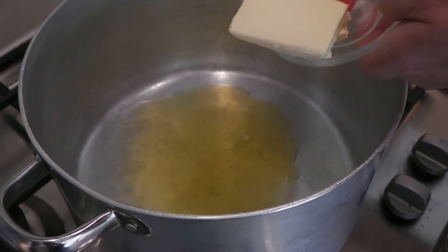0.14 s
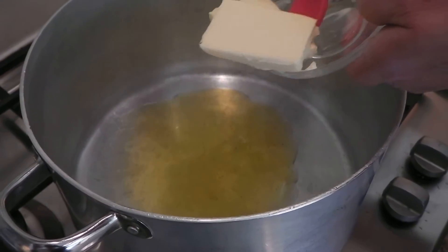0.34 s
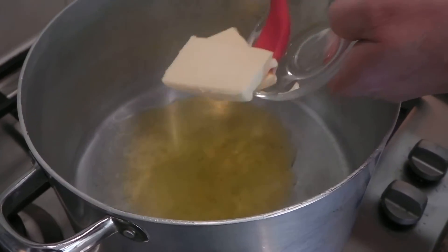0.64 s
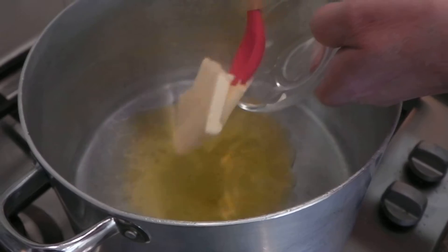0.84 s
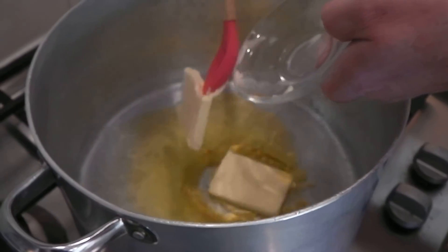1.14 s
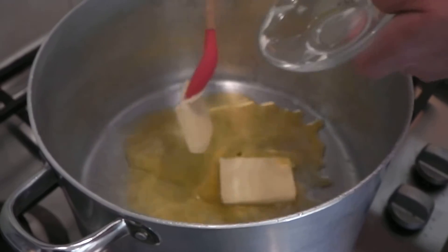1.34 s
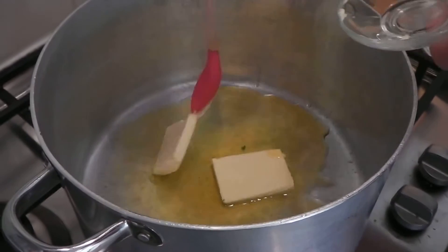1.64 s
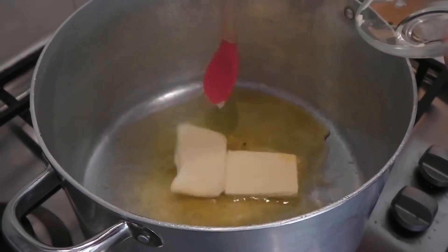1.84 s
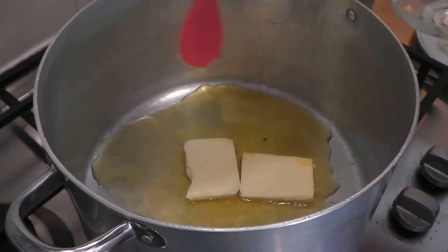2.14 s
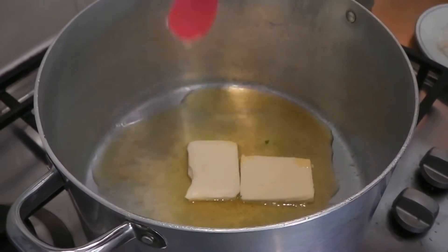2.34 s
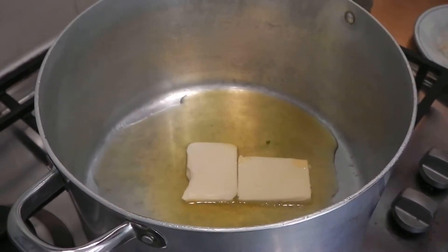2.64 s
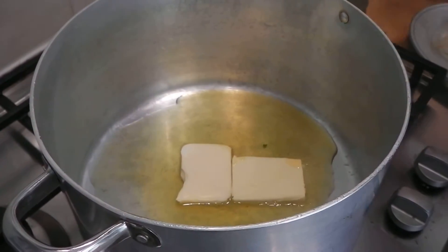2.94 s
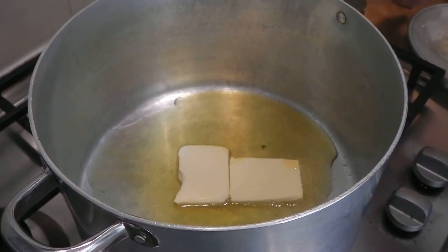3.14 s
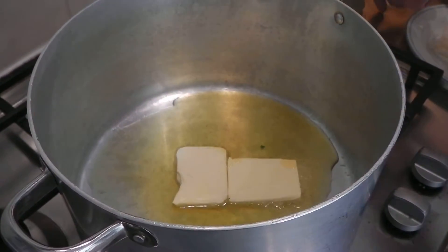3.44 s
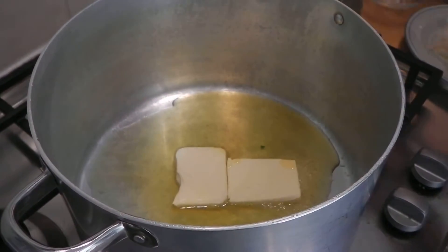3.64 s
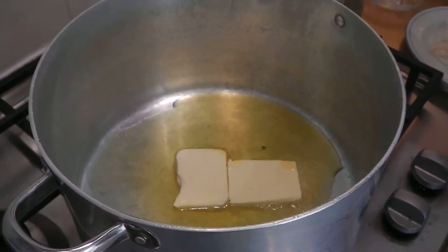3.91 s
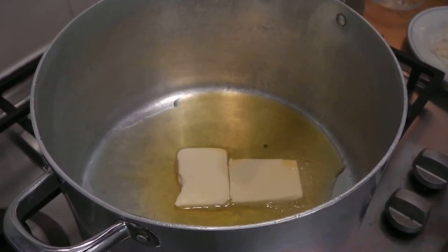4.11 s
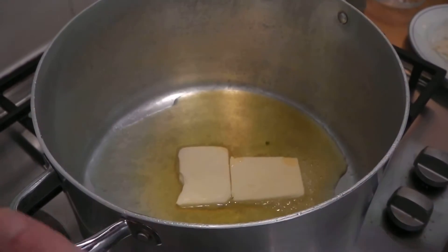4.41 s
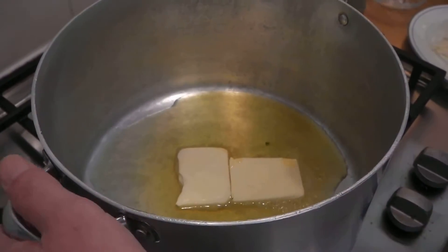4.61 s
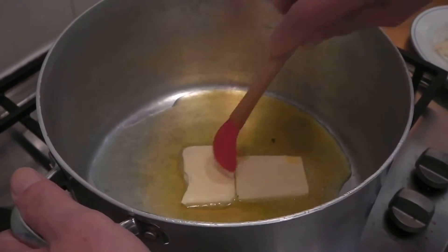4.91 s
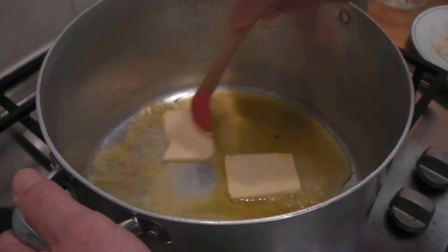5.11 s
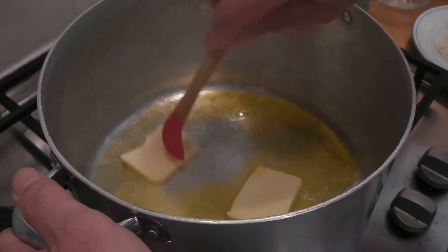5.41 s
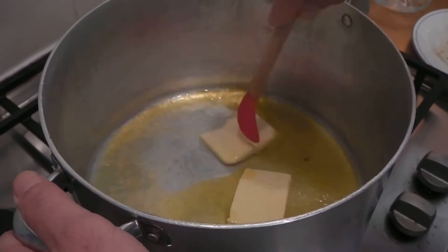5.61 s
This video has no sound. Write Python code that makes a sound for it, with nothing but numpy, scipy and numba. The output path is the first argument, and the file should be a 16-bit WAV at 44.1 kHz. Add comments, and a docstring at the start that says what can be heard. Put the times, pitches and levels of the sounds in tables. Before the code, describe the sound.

Close above a steel pot on a gas stove in a small kitchen, stereo. Steady burner hiss with faint low bubble pings; butter lands with a small wet click, another follows, and sizzling grows. A glass dish is set down with a ringing clink, rattles and drags briefly. The sizzle thickens with sharp spits, then a hard spatula knock and softer thuds on the pot.

```python
"""A gas burner hisses under a steel pot of hot oil; slabs of butter slide in and sizzle, heard from close above.
The jets are noise in fixed resonances; boiling is a sum of decaying tones and puffs of band-limited noise.
Bubbles spit as pitched pops in steam, or ping low with rising pitch; blows excite the damped modes of the pot.
A glass dish, set down and dragged on the counter of a small kitchen, adds struck modes and rough sliding noise."""
import sys
import numpy as np
from scipy import signal
from scipy.fft import rfft, irfft, next_fast_len
from scipy.io import wavfile
from scipy.ndimage import uniform_filter1d
from numba import njit

SR = 44100
rng = np.random.default_rng(int(sys.argv[2]) if len(sys.argv) > 2 else 0)


def digitize_waveform(pressure):
    """Quantize a signal to 16-bit integers and store it at the path in sys.argv[1].

    Rows of a 2-D input are taken as channels; values are limited to [-1, 1].
    """
    field = np.atleast_2d(pressure).T
    bounded = np.clip(field, -1, 1)
    quanta = np.round(bounded * 32767).astype(np.int16)
    wavfile.write(sys.argv[1], SR, quanta)


def linear_from_db(decibels):
    """Turn decibels (scalar or array-like) into linear amplitude factors; 0 gives 1."""
    return 10 ** (np.asarray(decibels, float) / 20)


N = 254317
T = np.arange(N) / SR

# Resonances of the gas jets: [f/Hz, width/Hz, relative level/dB]
JETS = [(1663.5, 120, -1.5), (2544, 23, -15), (4034, 203, -4.5), (5630, 75, -21), (6190, 140, -7.5),
        (7210, 210, -17.5), (9050, 150, -26), (10760, 610, -28), (14200, 100, -32)]
# Hush of the kitchen, relative spectrum: [f/Hz, level/dB per Hz]
KITCHEN_SPECTRUM = [(15, -64), (25, -53), (84, -7.5), (236, -20.5), (416, -11.5), (887, -12.5), (1650, -9),
                    (2000, -14), (2910, -18), (4030, -23), (5140, -19.5), (6210, -14.5), (7920, -18.5),
                    (10700, -31), (16000, -23.5)]
# Water boiling in the butter: [t/s, fizz level/dB before the low part is scaled, treble spray level/dB,
# pot hum level/dB, gain of the low fizz/dB]
BOILING = [(1.05, -60, -59, -43, -6), (1.3, -63, -64, -57, -8), (1.5, -44.5, -49.5, -44.5, -9),
           (1.8, -46, -55, -50, 7), (1.88, -48.5, -64, -48, -19), (2.0, -53, -60, -48, -7),
           (2.15, -36.5, -48, -40, 5), (2.6, -41.5, -48, -37, 3.5), (3.05, -33, -45.5, -37.5, -4),
           (3.11, -38.5, -45, -40.5, -13), (3.3, -34.5, -44, -32, 3), (3.5, -33.5, -41.5, -69, -21),
           (3.7, -31, -43, -37, -3), (4.5, -28, -48.5, -38.5, -3.5), (4.66, -30.5, -54, -36.5, -3.5),
           (5.05, -28.5, -45, -39.5, -5.5), (5.3, -31, -42, -46, -2), (5.6, -28, -37, -46.5, -7.5),
           (5.77, -30.5, -35, -40, -3)]
# Relative spectrum of the fizz: [f/Hz, level/dB per Hz]
FIZZ_SPECTRUM = [(350, -62), (600, -30), (931, -8), (1370, -8.5), (1530, -3), (1980, -10), (3080, -2.5),
                 (3340, -7), (5050, -1), (7110, -3), (7940, -6.5), (8990, 2), (16000, -22)]
# Modes of the pot before the oil damps them: [f/Hz, t60/s]
POT_MODES = [(370, 0.42), (425, 0.31), (650, 0.11), (800, 0.22), (940, 0.15), (1270, 0.41), (1670, 0.12),
             (2062, 0.29), (2350, 0.12), (2600, 0.21), (3120, 0.099), (3640, 0.2), (3890, 0.16),
             (4140, 0.16), (4930, 0.098), (5300, 0.47), (6060, .1), (6920, 0.042)]
# Share of each pot mode: [relative level/dB]
POT_SHARES_DB = [-6.5, 1.5, -14, -7, 0.5, -9, -9, -9, -3.5, -2, 1.5, -5, 2, 2.5, -5.5, -17, -28, -10.5]
# Loudest spitting bubbles: [t/s, pop level/dB, nominal f/Hz]
LOUD_SPITS = [(1.1505, -21.5, 3670), (1.905, -21, 6300), (2.767, -20.5, 6000), (2.915, -16, 4120),
              (2.954, -23, 5600), (2.979, -25, 6080), (3.05, -25, 4840), (3.2695, -21, 2430),
              (3.8153, -18.5, 4450), (3.935, -20.5, 5970), (4.0749, -19.5, 5390), (4.1474, -24, 5450),
              (4.1565, -16.5, 4850), (4.2767, -20, 5240), (4.5232, -16, 5280), (4.634, -17, 4960),
              (4.674, -16, 5190), (4.7206, -17.5, 5030), (4.9298, -14.5, 4440), (4.99, -20, 5700),
              (5.0168, -16.5, 5300), (5.065, -17, 5820), (5.077, -23, 5740), (5.0983, -17, 5780),
              (5.1186, -20, 4530), (5.1804, -18, 6540), (5.209, -18.5, 5150), (5.254, -26, 5400),
              (5.2713, -21, 4580), (5.2879, -18.5, 4080), (5.3928, -19, 4240), (5.5202, -18.5, 4340),
              (5.5694, -19.5, 5000), (5.6217, -20, 3800), (5.677, -20.5, 3050), (5.698, -16, 3920),
              (5.7334, -24, 3960), (5.7566, -8.5, 4150)]
# Loudest droplets that crack in the treble alone: [t/s, level/dB]
LOUD_TICKS = [(1.1317, -24), (1.151, -21.5), (1.25, -40), (1.909, -23), (2.229, -28.5), (2.704, -29.5),
              (2.954, -27), (3.1234, -13), (3.2387, -33), (3.342, -24.5), (3.6732, -34), (3.9, -27.5),
              (3.9863, -28.5), (4.0107, -29), (4.15, -22.5), (4.2344, -27.5), (4.2833, -45), (4.301, -28),
              (4.365, -32), (4.4144, -29), (4.4963, -22.5), (4.65, -30), (4.707, -32), (4.804, -28.5),
              (4.82, -36), (5.045, -20.5), (5.074, -22.5), (5.108, -20), (5.2053, -23), (5.273, -26),
              (5.3738, -33), (5.6971, -27)]
# Clearest slow bubbles on the floor of the pot, pinging the air inside: [t/s, level/dB, f/Hz at the start]
BUBBLE_PINGS = [(0.063, -39.5, 425), (0.194, -40, 428), (0.329, -40, 426), (.458, -53, 420),
                (0.692, -47.5, 374), (0.726, -47, 382), (0.765, -43, 396), (.863, -52, 405),
                (0.927, -45, 404), (.96, -43, 412), (1.013, -35.5, 415), (1.201, -42, 437),
                (1.235, -42.5, 435), (1.271, -42.5, 416), (1.413, -37, 413), (1.444, -46, 394),
                (1.582, -38.5, 423), (1.62, -42.5, 442), (1.665, -39.5, 400), (1.712, -41.5, 413),
                (1.924, -44, 420), (1.98, -43, 405), (2.28, -41, 370), (2.498, -41, 408), (2.546, -40, 329),
                (4.756, -31.5, 402), (4.933, -38, 398), (5.008, -38.5, 390), (5.248, -29, 403),
                (5.366, -37, 383), (5.431, -56.5, 440), (5.496, -35.5, 426), (5.603, -35.5, 367),
                (5.629, -40, 407), (5.667, -36.5, 416), (5.717, -39, 346)]
# Butter, spatula and hand on the pot: [t/s, relative level/dB, contact/ms, relative crack level/dB]
POT_BLOWS = [(1.133, -26, .8, -6), (1.151, -26.5, 0.32, 14), (1.163, -34, 0.56, -17),
             (3.853, -27.5, 2.6, -14), (4.653, -6.5, 0.39, 5.5), (4.691, -18, 0.59, -20),
             (4.878, -13, 0.65, 3), (5.124, -15, 2.1, -17), (5.219, -20, 1.9, -20)]
# Oil slapping the bare pot: [t/s, level/dB, middle f/Hz, t60/s of the middle pitch]
OIL_SLAPS = [(1.132, -18, 2670, 0.029), (1.1308, -19.5, 5320, 0.025), (1.9094, -15.5, 3290, 0.027),
             (1.9088, -23, 6470, 0.015)]
# Modes of the glass dish: [f/Hz]
DISH_MODES_HZ = [700, 1480, 1545, 2250, 2506, 2950, 3770, 5238]
# The same modes ringing free: [relative level/dB, t60/s]
DISH_RINGING = [(-18, 0.46), (-1.5, 0.56), (-12, 0.6), (-24, 0.38), (3.5, 0.3), (-19, 0.16), (-3, 0.11),
                (-15, 0.17)]
# Modes of the counter and what lies on it: [f/Hz, relative level/dB, t60/s before any cap]
COUNTER_MODES = [(442, -8, 0.11), (1053, -1, 0.06), (1817, 2.5, 0.063), (2430, -4, 0.059),
                 (2820, -6, 0.043), (3610, -1, 0.023), (4570, -26, 0.016), (5340, -21, 0.023),
                 (7150, -16, 0.023), (8900, -12.5, 0.076)]
# Dish put down: [t/s, glass level/dB, counter level/dB, share of the free t60, hardness/dB per octave]
DISH_KNOCKS = [(3.1245, -54, -14, .5, 0), (3.1529, -8.5, -53, 0.78, 0.7), (3.197, -28, -19.5, 1.1, 10),
               (3.389, -18, -27, 0.46, 8.5), (3.499, -45, -35.5, 0.24, 0), (3.506, -41, -23, 0.19, 0),
               (3.541, -33, -27, 0.34, 3), (3.577, -54, -31, .3, 0), (3.5972, -26, -23, 0.19, 3),
               (3.612, -49, -23.5, 0.4, 2), (3.63, -35, -57, 0.4, -10)]
# Handling that shakes stove top and counter: [t/s, level/dB, hold/s, deep part relative to it/dB]
SHAKING = [(1.125, -53, 0.04, 3), (1.705, -54, 0.011, -6), (3.125, -41.5, .12, -23), (3.41, -48, 0.011, -5),
           (3.51, -40.5, 0.11, -14), (3.795, -56, .015, -11), (3.869, -47, 0.015, -18),
           (4.651, -33, 0.064, -17), (4.8, -45.5, 0.12, -12.5), (4.915, -45.5, 0.027, -23),
           (5.0, -47, 0.05, -12), (5.12, -44, 0.092, -14), (5.22, -51, 0.071, -12)]
# Gain of the side signal: [f/Hz, gain/dB]
SIDE_GAIN = [(60, -6), (110, -6.5), (200, -3), (380, -1), (700, -5.5), (1290, -14), (2380, -9),
             (4400, -4.5), (8120, -0.5), (15000, .5)]
# Balance: [t/s, left minus right gain/dB]
BALANCE = [(0.0, 1.6), (1.0, 0.8), (2.0, 0.5), (5.77, -0.9)]

BURNER_DB, BURNER_DRIFT_DB, KITCHEN_DB = -41.5, 1.9, -50.5
SPIT_T60_S, STEAM_DB, SPRAY_DB = 0.06, -10.5, -20.5  # steam and spray relative to the pop
SMALL_SPIT_DB, SMALL_SPIT_HZ = -2, (3110, 6300)  # lesser spits relative to the fizz
TICK_T60_S, SMALL_TICK_DB = 0.025, 7  # lesser ticks relative to the treble spray
FOLLOW_S, FOLLOW_DB = 0.065, -7.5  # delay and relative level of the smaller bubble
DRAG_START_S, DRAG_STOP_S, DRAG_DB = 3.49, 3.604, -25
DRAG_ATTACK_S, DRAG_T60_S = 0.054, 0.41
RUMBLE_RISE_S, RUMBLE_T60_S = 0.01, 0.26
BASS_SIDE_DB, HIT_SIDE_DB = -10, -2
ROOM_T60_S, ROOM_DB = 0.32, -12.5
NOTCH_HZ, NOTCH_WIDTH_HZ, TOP_HZ = 7837, 590, 15750


def level(x, db=0):
    """Normalisation: scale a signal to an rms level."""
    return x * linear_from_db(db) / np.sqrt(np.mean(x ** 2))


def curve(table):
    """Linear interpolation: columns of a time table at every sample, with the ends held."""
    s, *columns = np.transpose(table)
    return [np.interp(T, s, c) for c in columns]


def shape(x, gain):
    """Spectral multiplication: filter by a gain given as a function of frequency."""
    size = next_fast_len(N)
    hz = np.maximum(np.arange(size // 2 + 1) * SR / size, 1)
    return irfft(rfft(x, size) * gain(hz), size)[..., :N]


def colour(x, points):
    """Spectral envelope: filter by (Hz, dB) points joined on a logarithmic frequency axis."""
    hz, db = np.transpose(points)
    return shape(x, lambda f: linear_from_db(np.interp(np.log(f), np.log(hz), db)))


def above(x, lo_hz):
    """High-pass filtering: a steep cut below one frequency."""
    return shape(x, lambda f: 1 / np.sqrt(1 + (lo_hz / f) ** 12))


def noise():
    """Incoherence: unrelated white noise for mid and side."""
    return rng.standard_normal((2, N))


def band(lo_hz, hi_hz):
    """Band limitation: noise between two frequencies, of rms 1."""
    return level(shape(noise(), lambda f: 1 / np.sqrt((1 + (lo_hz / f) ** 8) * (1 + (f / hi_hz) ** 8))))


@njit
def add(out, start, hz, t60, size, glide, phase):
    """Damped oscillation: decaying, gliding sines; the side hears each with its own phase."""
    for k in range(len(start)):
        turn = 2 * np.pi * hz[k] / SR
        p = np.exp(1j * turn - np.log(1000) / (t60[k] * SR))  # rotation and decay per sample
        bend = np.exp(1j * turn * glide / (t60[k] * SR))
        z, other = size[k] + 0j, np.exp(1j * phase[k])
        for i in range(start[k], min(start[k] + int(t60[k] * SR), out.shape[1])):
            out[0, i] += z.imag
            out[1, i] += (z * other).imag
            z, p = z * p, p * bend


def rings(s, hz, t60, db, glide=0.):
    """Superposition: one damped ring for each entry of the broadcast arguments."""
    s, hz, t60, db = (1. * a.ravel() for a in np.broadcast_arrays(s, hz, t60, db))
    out = np.zeros((2, N))
    phase = rng.uniform(0, 2 * np.pi, len(s))
    add(out, (s * SR).astype(np.int64), hz, t60, linear_from_db(db), glide, phase)
    return out


def struck(s, hz, t60, db):
    """Staggered onset: the modes of a blow start at slightly different random moments."""
    return rings(s + 0.0061 * rng.random((len(s), len(hz))), hz, t60, db)


def decay(kicks, t60):
    """Exponential decay: every kick dies away by 60 dB in t60 seconds."""
    return signal.lfilter([1], [1, -np.exp(-np.log(1000) / (t60 * SR))], kicks)


def bursts(s, db, t60):
    """Impulsive excitation: an envelope that jumps at each time and dies away."""
    return decay(np.bincount((s * SR).astype(int), linear_from_db(db), N)[:N], t60)


def held(s, hold, attack, t60):
    """Sustained excitation: an envelope that rises from s, then decays from s + hold."""
    return np.clip((T - s) / attack, 0, 1) * np.exp(-np.log(1000) * np.maximum(T - s - hold, 0) / t60)


def lesser(count, level_db, spread_db, range_hz):
    """Random point process: rows (s, dB, Hz) of small events whose size follows a sampled level."""
    when, size, pitch = rng.random((count, 3)).T
    db = level_db[(when * N).astype(int)] + spread_db * (size - 0.5)
    return np.array([when * N / SR, db, range_hz[0] * (range_hz[1] / range_hz[0]) ** pitch])


def puffs(count, spread_db, t60):
    """Intermittent flow: uneven puffs at random moments, yet even over a tenth of a second."""
    when, size = rng.random((count, 2)).T
    kicks = np.zeros(N)
    kicks[(when * N).astype(int)] = linear_from_db(spread_db * size)
    flow = 2.1 + decay(kicks, t60)
    return flow / uniform_filter1d(uniform_filter1d(flow, size=4000), size=4000)


def grains(count, lo_hz, hi_hz, cycles, spread_db):
    """Granular superposition: bubbles burst at random moments, few large among many small."""
    when, pitch, length, size = rng.random((count, 4)).T
    hz = lo_hz * (hi_hz / lo_hz) ** pitch
    db = spread_db * np.minimum(-np.log(1 - size), 4.5)
    return level(rings(when * N / SR, hz, cycles * (0.5 + length) / hz, db, glide=0.28))


def burner():
    """Resonant jet noise: narrow bands over the kitchen hush; the hiss level drifts slowly and slightly at random."""
    def resonances(f):
        return np.sqrt(sum(linear_from_db(2 * db) / (1 + (2 * (f - hz) / width) ** 2) ** 1.45
                           for hz, width, db in JETS))
    jets = level(shape(noise(), resonances), BURNER_DB)
    drift = level(np.interp(T, np.linspace(0, T[-1], 24), rng.standard_normal(24)))
    hush = level(colour(noise(), KITCHEN_SPECTRUM), KITCHEN_DB)
    return jets * linear_from_db(BURNER_DRIFT_DB * drift) + hush


def rumble():
    """Forced low-frequency vibration: handling excites low noise with a separately weighted deeper part."""
    low, deep = band(102, 166), band(36, 95)
    return sum(linear_from_db(db) * held(s, hold, RUMBLE_RISE_S, RUMBLE_T60_S) * (low + linear_from_db(deep_db) * deep)
               for s, db, hold, deep_db in SHAKING)


def knocks():
    """Impact excitation: glass on a hard counter sets the modes of both ringing."""
    s, glass_db, clack_db, free, hard_db = np.transpose(DISH_KNOCKS)[:, :, None]
    share_db, t60 = np.transpose(DISH_RINGING)
    tilt_db = hard_db * np.log2(np.array(DISH_MODES_HZ) / 2500)
    glass = struck(s, DISH_MODES_HZ, free * t60, glass_db + share_db + tilt_db)
    hz, share_db, t60 = np.transpose(COUNTER_MODES)
    clack = struck(s, hz, np.minimum(t60, 0.09), clack_db + share_db)
    rattle = bursts(s.ravel(), clack_db.ravel() + 3.5, 0.088) * band(780, 5700)
    return above(glass + clack, 253) + rattle


def drag():
    """Stick-slip friction: the foot of the dish catches and slips, shaking the counter with rough noise."""
    def resonances(f):
        return np.sqrt(sum(linear_from_db(2 * db) / (1 + ((f - hz) * 0.92 * t60) ** 2)
                           for hz, db, t60 in COUNTER_MODES))
    scrape = level(above(shape(noise(), resonances), 320), -6.0)
    motion = held(DRAG_START_S, DRAG_STOP_S - DRAG_START_S, DRAG_ATTACK_S, DRAG_T60_S)
    sliding = linear_from_db(DRAG_DB) * motion * puffs(count=500, spread_db=2.0, t60=0.024)
    return sliding * (scrape + linear_from_db(-3) * band(320, 2600))


def thuds():
    """Contact-time filtering: a longer blow excites fewer high modes of the pot; the oil damps them soon."""
    s, db, ms, crack_db = np.transpose(POT_BLOWS)
    hz, t60 = np.transpose(POT_MODES)
    share_db = POT_SHARES_DB - 10 * np.log10(1 + (hz * ms[:, None] / 1000) ** 2)
    ring = above(struck(s[:, None], hz, 0.35 * t60, db[:, None] + share_db - 7.5), 295)
    crack = bursts(s, db + crack_db - 16.5, 0.063) * band(1040, 7000)
    body = bursts(s, db - 19.5, 0.22) * band(700, 1180)
    return ring + crack + body


def slaps():
    """Impulsive impact: oil slaps the bare pot in a hard click of three close, brief pitches."""
    s, db, hz, t60 = np.transpose(OIL_SLAPS)
    pitches = hz * np.array([[0.9], [1], [1.1]])
    return above(rings(s, pitches, t60 * np.array([[0.5], [1], [0.5]]), db), 2600)


def blips():
    """Bubble resonance: a ping rises in pitch as the bubble lifts off; a weaker, shorter one follows."""
    s, db, hz = np.transpose(BUBBLE_PINGS)
    first = rings(s, hz, 0.12, db, glide=0.29)
    second = rings(s + FOLLOW_S, hz, 0.07, db + FOLLOW_DB, glide=0.1)
    return shape(first + second, lambda f: 1 / (1 + (np.log(f / 420) / 0.37) ** 4))


def spits():
    """Bubble collapse: a pitched pop in a hiss of steam and fine spray; droplets crack higher up."""
    # silent until the boiling begins
    fizz_db, spray_db = np.array(curve(BOILING)[:2]) - 99 * (T < BOILING[0][0])
    small = lesser(count=220, level_db=fizz_db + SMALL_SPIT_DB, spread_db=7.0, range_hz=SMALL_SPIT_HZ)
    s, db, hz = np.hstack([np.transpose(LOUD_SPITS), small])
    # each spit is a little cluster: the first bubble sets off three more close by
    late, near = rng.random((len(s), 2, 4)).transpose(1, 2, 0) * [[0], [1], [1], [1]]
    times = s + 0.34 * SPIT_T60_S * late
    pitches = hz * 1.25 ** (near * [[0], [1], [-1], [0.5]])
    pop = above(rings(times, pitches, 0.53 * SPIT_T60_S, db - 17.6 * late), 2560)
    steam_flow = uniform_filter1d(bursts(s + 0.0011, db + STEAM_DB, SPIT_T60_S), size=120)
    steam = steam_flow * band(3630, 5740)
    spray = bursts(s, db + SPRAY_DB, 0.5 * SPIT_T60_S) * band(7600, 9700)
    small = lesser(count=70, level_db=spray_db + SMALL_TICK_DB, spread_db=4.0, range_hz=(1, 1))[:2]
    when, tick_db = np.hstack([np.transpose(LOUD_TICKS), small])
    ticks = bursts(when, tick_db, TICK_T60_S) * band(6100, 13000)
    return pop + steam + spray + ticks


def sizzle():
    """Boiling noise: ragged puffs of fizz, short grains of fine spray, and a hum in the pot's modes."""
    fizz_db, spray_db, hum_db, low_db = curve(BOILING)
    flow = puffs(count=300, spread_db=20.0, t60=0.033)
    small = shape(grains(14000, 1657, 7470, 19.5, 2.5), lambda f: np.sqrt(f / 4000))
    # larger bubbles sing for a few dozen cycles
    large = above(grains(1500, 3360, 6750, 51, 2.1), 2800)
    bubbling = (small + linear_from_db(-3.0) * band(600, 5800)) * flow + linear_from_db(-4.5) * large
    fizz = level(colour(bubbling, FIZZ_SPECTRUM))
    fizz = fizz + (linear_from_db(low_db) - 1) * (fizz - above(fizz, 4340))
    mist = linear_from_db(3.5) * band(8000, 14500) * puffs(count=260, spread_db=11.0, t60=0.077)
    fine = grains(4000, 7900, 9500, 5.1, 4.9) + mist

    def resonances(f):
        # the lowest mode is left out and those near 620 Hz or below are weakened
        return np.sqrt(sum(linear_from_db(2 * db) / (1 + ((f - hz) * 0.3 * t60) ** 2) / (1 + (620 / hz) ** 6)
                           for (hz, t60), db in zip(POT_MODES[1:], POT_SHARES_DB[1:])))
    hum = level(shape(noise(), resonances))
    onset = np.clip((T - BOILING[0][0]) / 0.066, 0, 1)
    spray = level(fine * np.sqrt(flow))
    return onset * (linear_from_db(fizz_db) * fizz + linear_from_db(spray_db) * spray + linear_from_db(hum_db) * hum)


def room(near):
    """Reverberation: convolution with a short, exponentially decaying noise tail."""
    t = T[:SR // 2]
    tail = noise()[:, :SR // 2] * np.exp(-np.log(1000) * t / ROOM_T60_S) * (t > 0.004)
    tail = tail * linear_from_db(ROOM_DB) / np.sqrt(np.sum(tail ** 2, axis=1, keepdims=True))
    return signal.fftconvolve(near, tail, axes=1)[:, :N]


def scene():
    """Linear superposition: sources summed as mid and side with a room tail, then left and right."""
    # blows come from one spot, so the two sides hear them more alike
    bass = (blips() + thuds() + rumble()) * linear_from_db(np.array([[0], [BASS_SIDE_DB]]))
    hard = (knocks() + drag() + slaps()) * linear_from_db(np.array([[0], [HIT_SIDE_DB]]))
    near = sizzle() + spits() + bass + hard
    mid, side = near + room(near) + burner()
    side = colour(side, SIDE_GAIN)
    lean_db = curve(BALANCE)[0] / 2
    return np.array([(mid + side) * linear_from_db(lean_db), (mid - side) * linear_from_db(-lean_db)])


def band_limit(x):
    """A steep low-pass at the top of the band."""
    return signal.sosfilt(signal.butter(12, 16990, fs=SR, output="sos"), x)


def record(dry):
    """Band limitation and saturation: a narrow gap near 8 kHz, a steep top edge, hard limiting at full scale."""
    def response(f):
        gap = (1 - np.exp(-((f - NOTCH_HZ) / (NOTCH_WIDTH_HZ / 2)) ** 2)) ** 0.96
        return gap / (1 + (f / TOP_HZ) ** 300)
    mix = np.clip(shape(dry, response), -1, 1)
    return band_limit(mix)


dry = scene()
out = record(dry)
digitize_waveform(out)
```